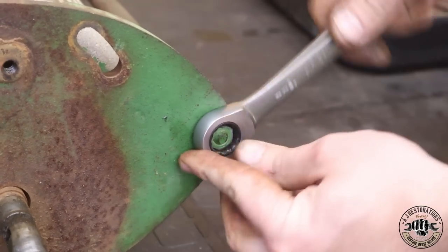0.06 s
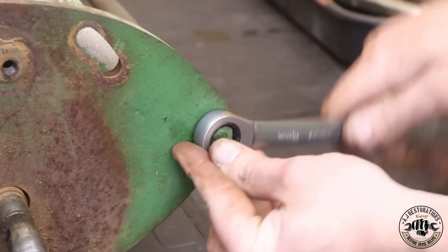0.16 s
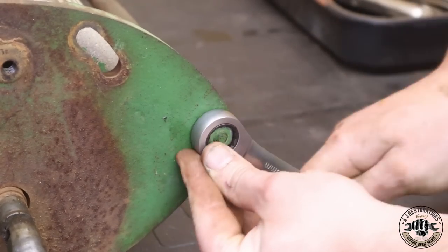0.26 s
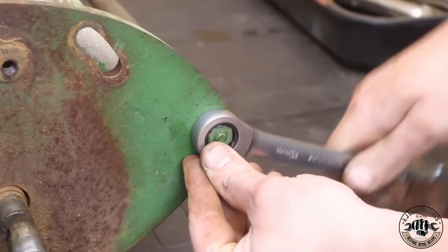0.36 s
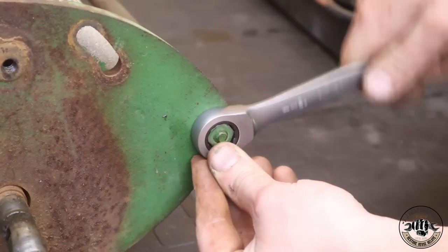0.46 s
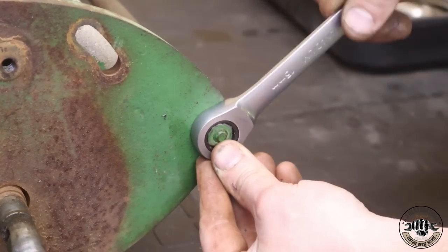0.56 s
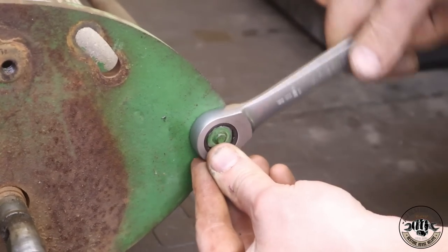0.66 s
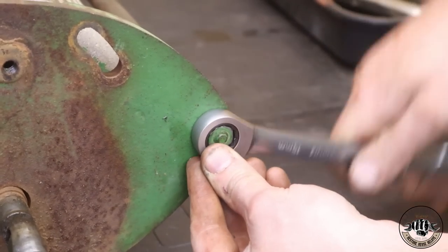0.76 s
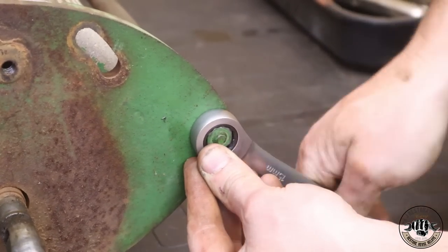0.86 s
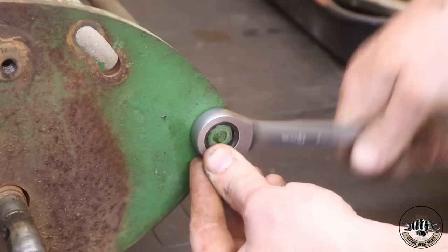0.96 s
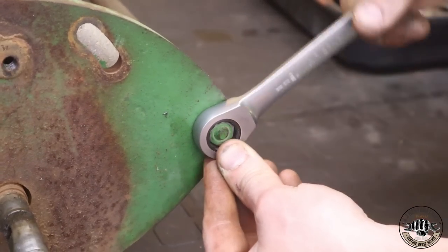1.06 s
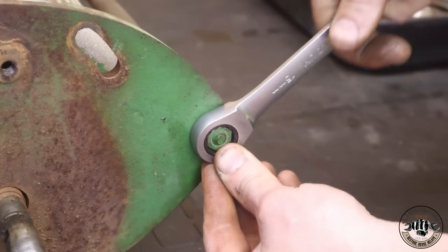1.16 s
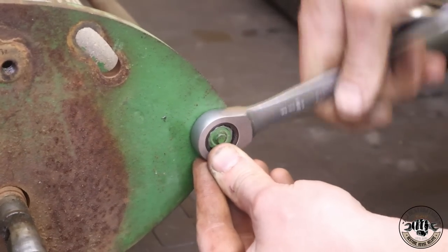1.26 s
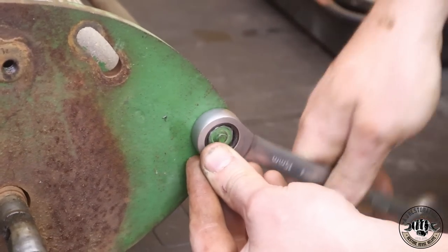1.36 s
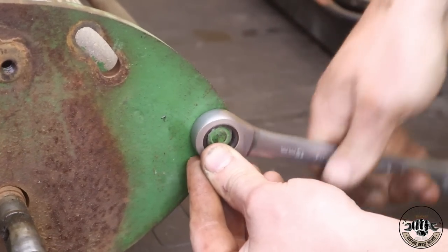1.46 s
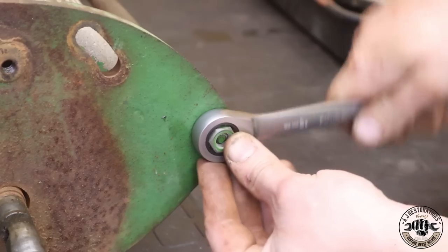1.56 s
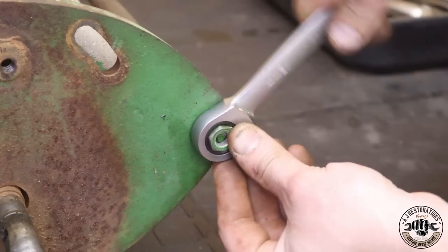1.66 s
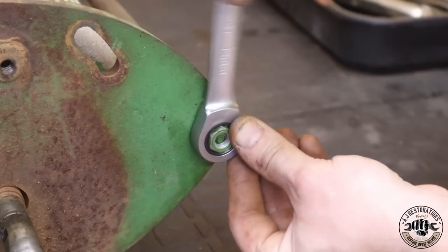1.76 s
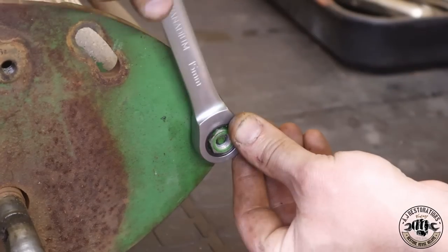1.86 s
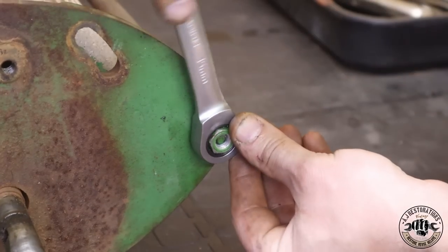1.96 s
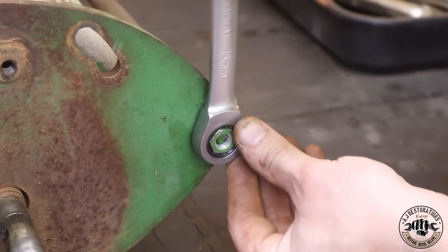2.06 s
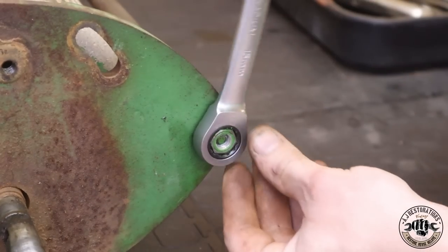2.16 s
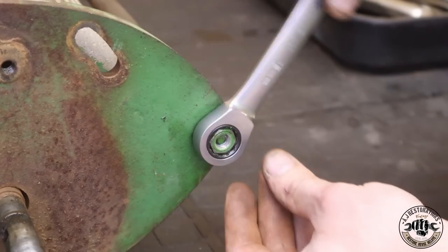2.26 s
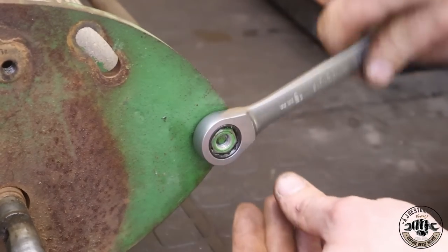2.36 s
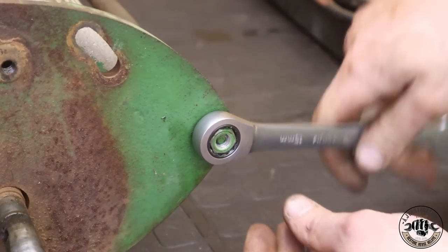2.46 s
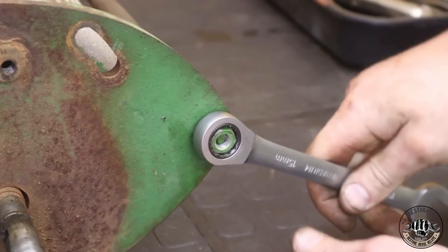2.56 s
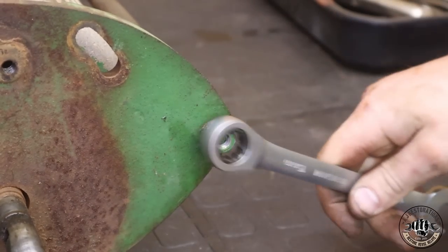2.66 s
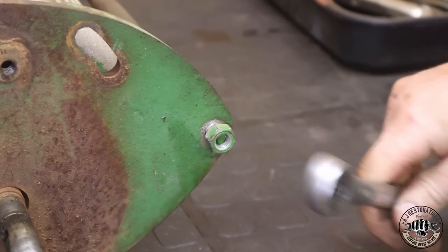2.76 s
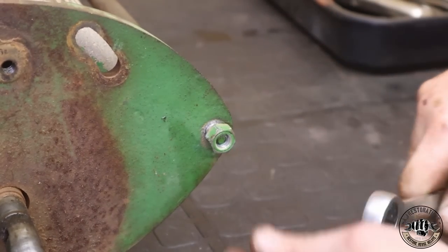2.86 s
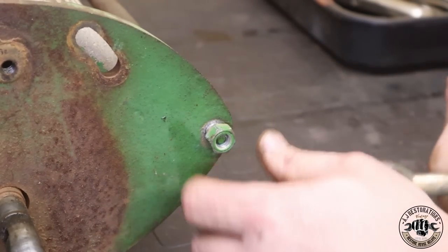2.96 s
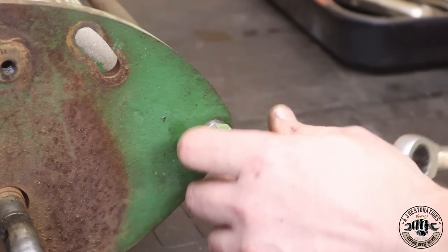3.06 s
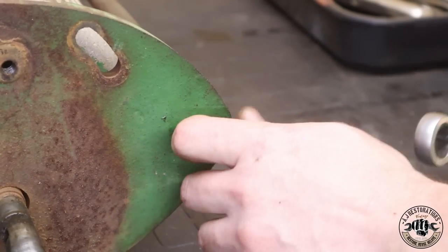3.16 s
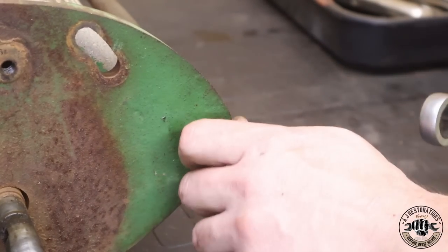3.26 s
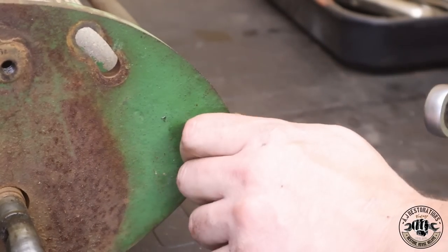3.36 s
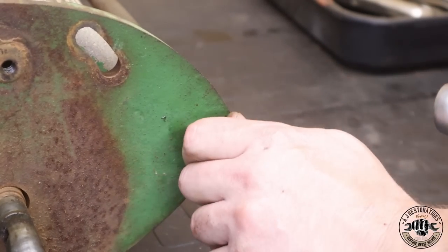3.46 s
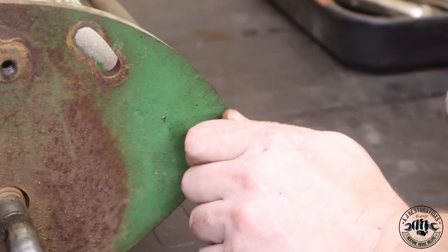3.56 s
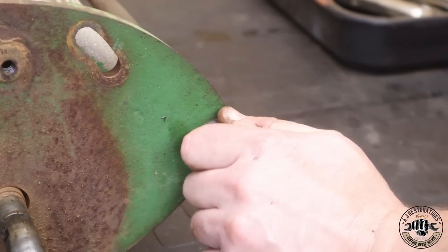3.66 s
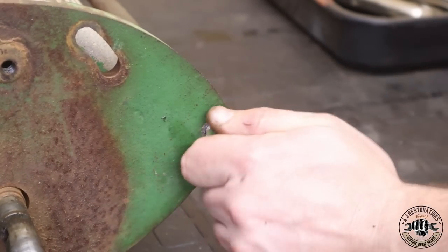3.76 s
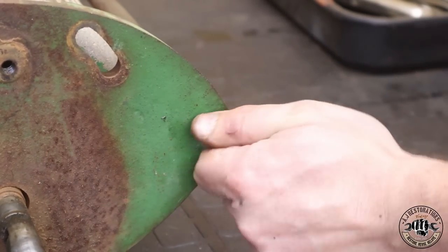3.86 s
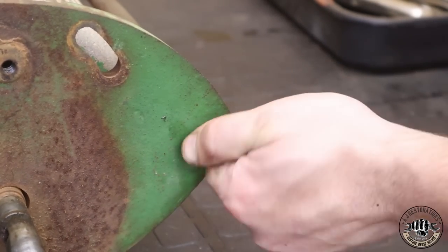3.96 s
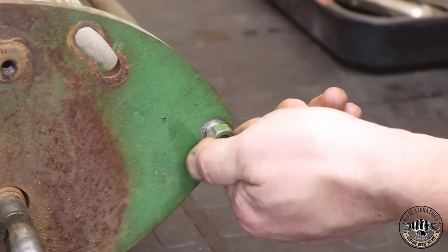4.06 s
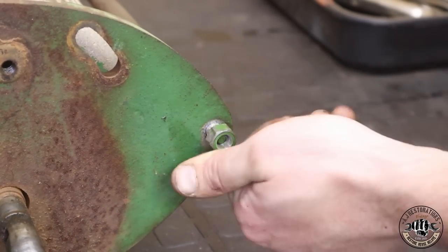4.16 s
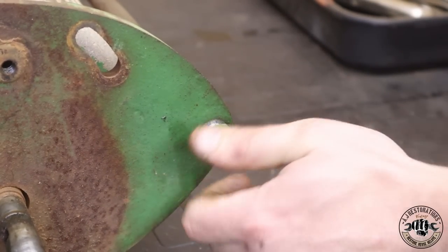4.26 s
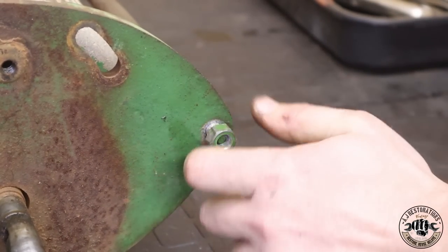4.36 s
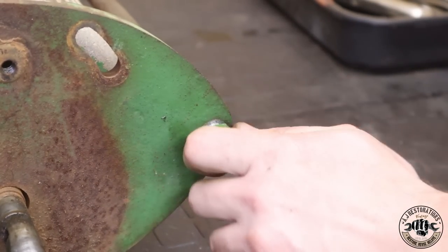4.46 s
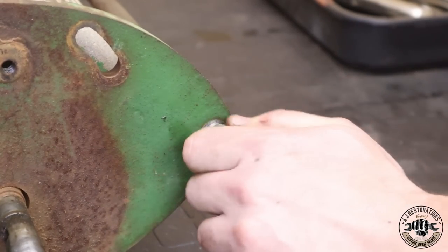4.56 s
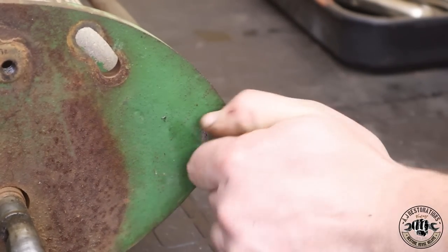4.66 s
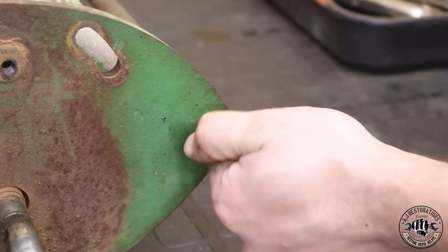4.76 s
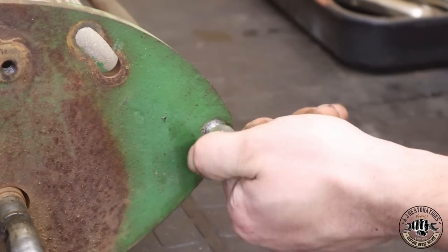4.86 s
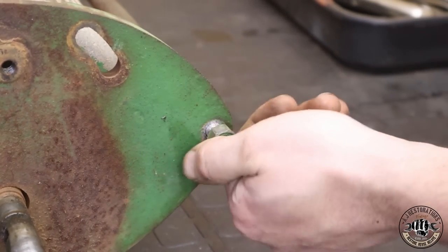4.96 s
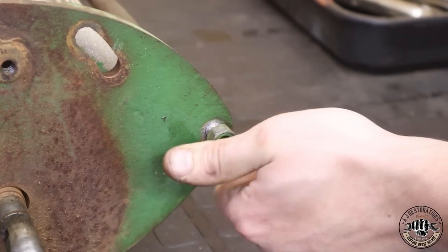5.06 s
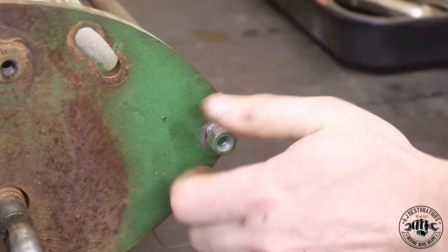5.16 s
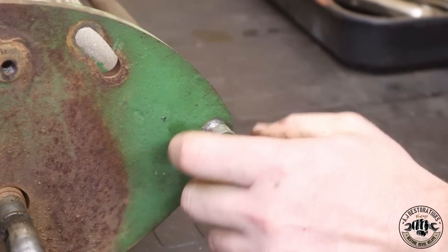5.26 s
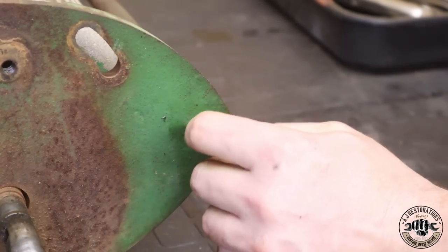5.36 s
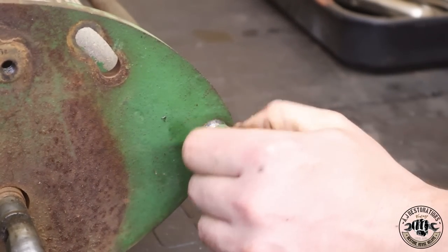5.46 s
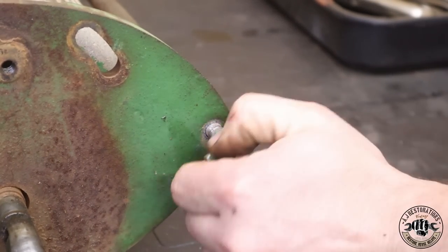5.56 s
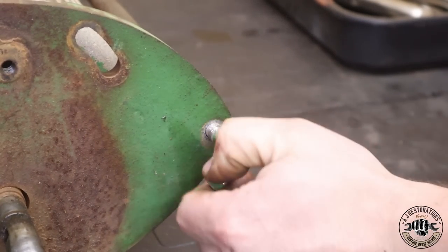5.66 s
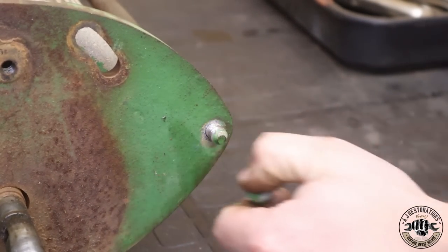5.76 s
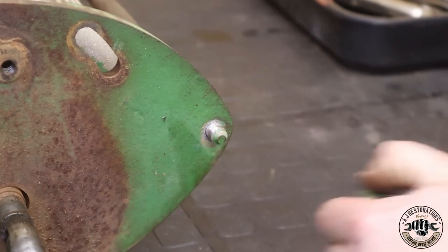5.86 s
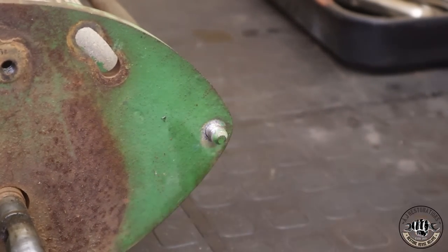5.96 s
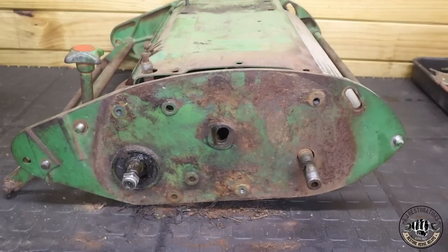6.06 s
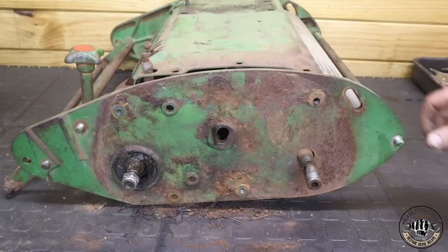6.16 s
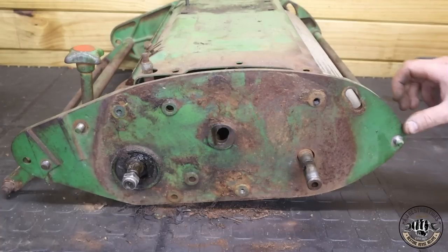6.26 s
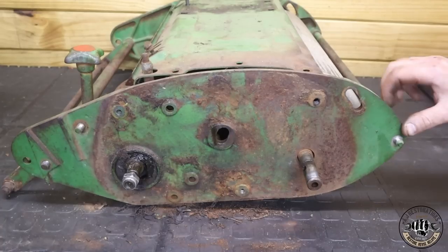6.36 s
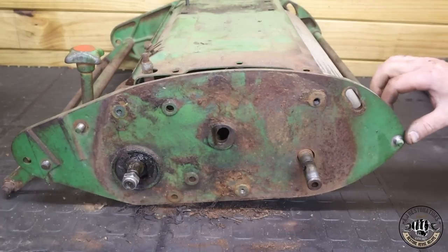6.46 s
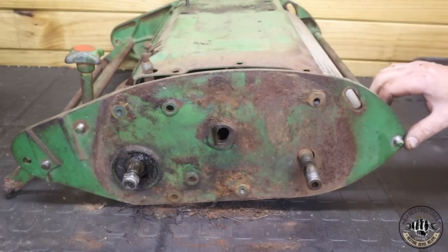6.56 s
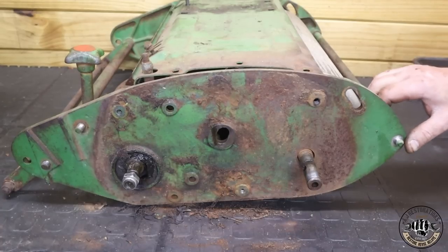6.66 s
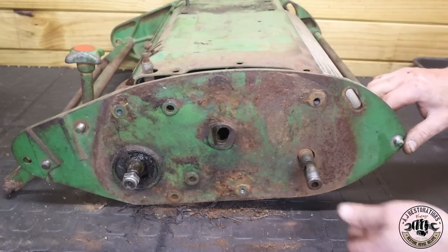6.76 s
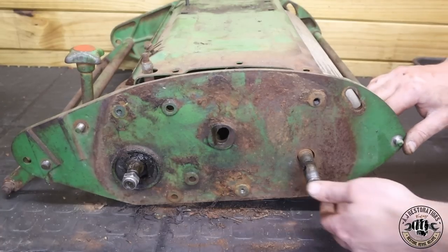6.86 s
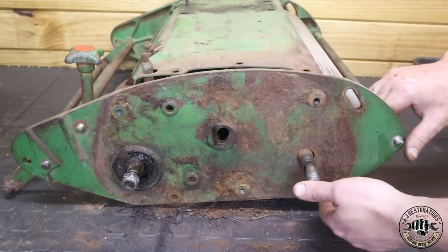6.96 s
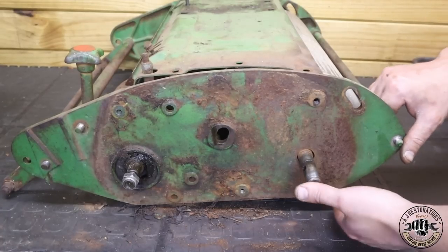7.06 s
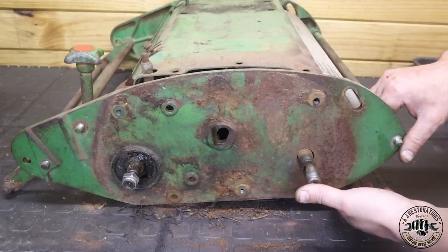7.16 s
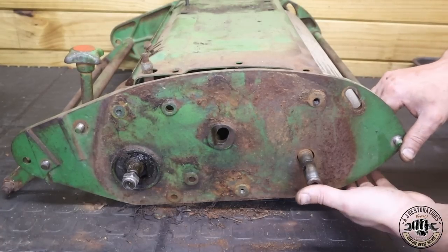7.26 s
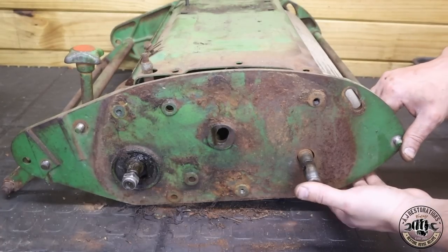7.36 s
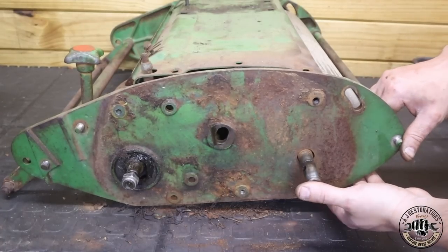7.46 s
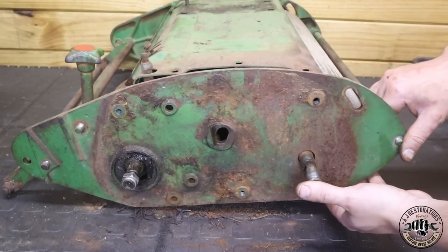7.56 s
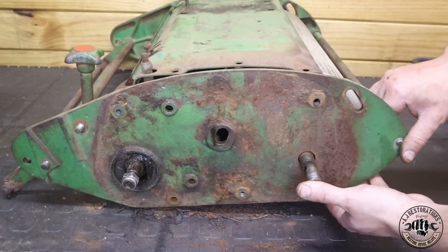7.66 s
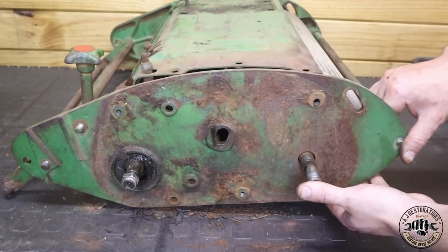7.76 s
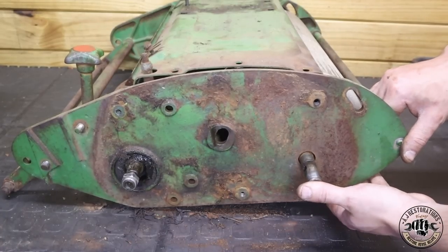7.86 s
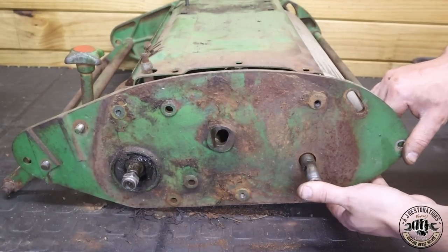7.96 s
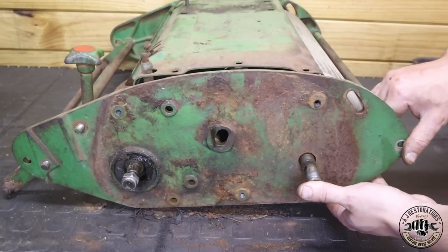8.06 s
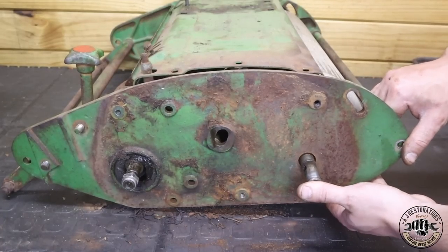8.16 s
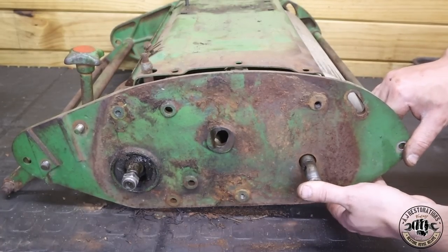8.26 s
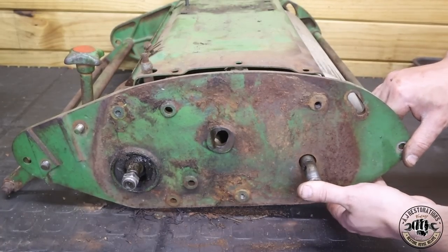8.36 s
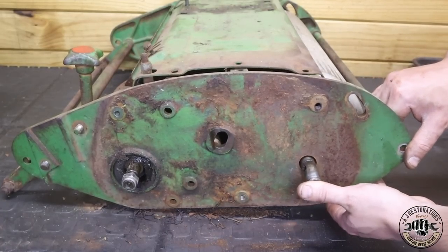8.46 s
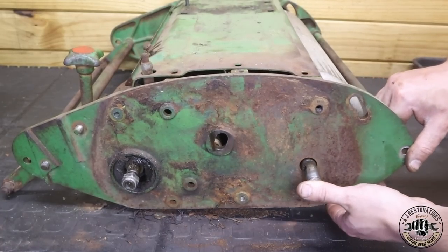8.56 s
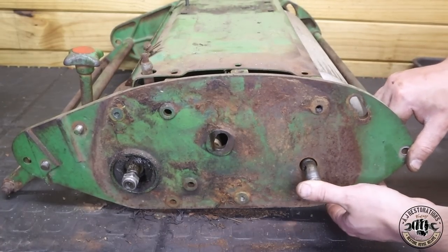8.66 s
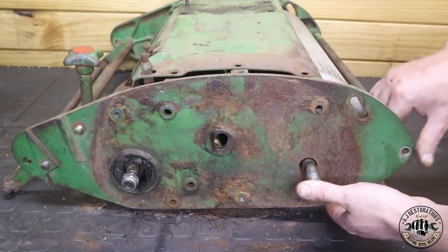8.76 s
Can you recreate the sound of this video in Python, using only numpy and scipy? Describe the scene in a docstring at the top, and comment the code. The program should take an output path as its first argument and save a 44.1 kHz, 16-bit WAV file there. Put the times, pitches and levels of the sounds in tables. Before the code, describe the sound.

In a quiet small workshop, heard close up in mono with low room air, a ratchet spanner turns a nut on a steel plate. Fast buzzing clicks, about 75 a second, come at 0.1-0.35, 0.8-0.9 and 1.35-1.45 s; between them are clinks and hollow plate thuds, strongest near 0.35, 0.7 and 0.9, lasting until 1.6. Around 2.1 single ticks run into a longer, brighter, freely ringing buzz at 2.3-2.65, then small clinks at 2.75 as the spanner lifts away. From 3.2 to 5.5 fingers twist the nut with barely audible gritty hisses; a light clink at 5.6. Faint far birds chirp around 2.8, 3.7, 4.3, 5.3 and 7.9. From 6.0 palms rub softly over metal. Rusty scrapes with groan and rasp come at 7.5, 7.6, 7.95, 8.25 and 8.45, then a hard double clang at 8.56 rings hollowly and fades.

```python
"""A ratchet spanner undoes a nut on the steel side plate of an old machine, close by in a small workshop.
The pawl buzzes over its teeth on each back swing; the ring takes up the load with thuds of the plate: struck modes.
Fingers spin the nut off, then the rusty casing is dragged off its shafts in short scrapes: showers of tiny slips.
It comes free with a clang of long shell modes. Birds, faint and far outside, are arching sines over quiet air."""
import sys
import numpy as np
from scipy import signal
from scipy.fft import rfft, irfft, next_fast_len
from scipy.io import wavfile

SR = 44100
rng = np.random.default_rng(int(sys.argv[2]) if len(sys.argv) > 2 else 0)


def persist_wave(psi):
    """Save psi, clipped to +-1, as 16-bit WAV."""
    counts = np.round(np.clip(psi, -1, 1) * 32767).astype(np.int16)
    wavfile.write(sys.argv[1], SR, np.atleast_2d(counts).T)


N = 388521
TIME = np.arange(N) / SR
RING_TIME = TIME[:SR * 6 // 10]   # time axis of one blow, 0.6 s

# Narrow bands that carry the dense modes of a blow: (centre Hz, filter)
EDGES = np.geomspace(20, 17000, 30)
BANK = [(np.sqrt(lo * hi), signal.butter(2, [lo, hi], "band", fs=SR, output="sos"))
        for lo, hi in zip(EDGES, EDGES[1:])]

# Levels in the tables are relative: each layer is scaled again where it is mixed.
# colour of the dense modes in a clink of the spanner's ring: freq_hz, level_db (per Hz)
CLINK_COLOUR = [(500, -8.5), (1100, 6), (1550, -2), (2100, -0.5), (4200, -7), (7000, -12.5), (9500, -22),
                (15000, -37)]
# ring time of the spanner's dense modes: freq_hz, t60_s
SPANNER_T60 = [(300, 0.22), (1500, 0.11), (7000, 0.12), (11000, 0.057), (15000, 0.061)]
# resonances of the spanner pressed on the plate: freq_hz, width_hz, level_db
HELD_PEAKS = [(1496, 120, 2), (1732, 79, -3), (2196, 110, -7.5), (2714, 130, -7.5), (2970, 43, -4),
              (3490, 24, 0.5), (4040, 44, -3), (4340, 43, -3.5), (4846, 134, -4), (5200, 35, -0.5),
              (6400, 110, -5.5), (6840, 46, -3.5), (6420, 28.3, 1), (7000, 75, -2), (7510, 66, -3.5),
              (8000, 31.4, -19), (8800, 90, -5), (9400, 75, -13), (9580, 38, -7), (11300, 29, -9)]


def ratchet():
    """Each tooth cracks and rings the spanner; a thumb on its head damps it and presses it to the plate."""
    thumb_off_s = 2
    # dense modes under the thumb: freq_hz, level_db (per Hz)
    held_colour = [(120, -60.5), (200, -30), (232, -23), (311, -31), (601, -18.5), (1000, -14),
                   (1120, -11.5), (1230, -11), (1480, -3.5), (2090, -12.5), (2610, -4.5), (4600, -6.5),
                   (6760, -4.5), (14600, -17.5), (16000, -17)]
    # dense modes of the spanner hanging free: freq_hz, level_db (per Hz)
    free_colour = [(120, -54.5), (200, -20), (380, -14), (519, -18.5), (933, -8.5), (1000, -17),
                   (1080, -20), (1230, -19), (1560, -0.5), (2420, -5), (3020, -0.5), (4600, -4), (6760, -1),
                   (8420, -13), (16000, -9.5)]
    # resonances of the spanner hanging free: freq_hz, width_hz, level_db
    free_peaks = [(1068, 13, 4.5), (1370, 7.5, 9), (1606, 180, -3.5), (2000, 62, -6), (2370, 15, 5.5),
                  (2660, 22, 8.5), (3100, 170, -2.5), (3240, 78, -14), (3430, 46, -32), (3630, 22, -5),
                  (3810, 120, -0.5), (4900, 105, -1), (5260, 15, 11.5), (5600, 31, -18), (5840, 200, -21),
                  (6400, 70, -15), (6970, 150, 2.5), (7900, 51, 3), (7670, 40, -16.5), (8200, 60, -41),
                  (8600, 51, -23), (8800, 27, -8.5), (8740, 42, -10.5), (8900, 22.1, -1), (9200, 40, 1.5),
                  (9900, 31, -24.5), (9150, 31, 1.5), (10400, 120, -27.5), (11100, 41, 1),
                  (11430, 100, -19)]

    teeth = pawl()
    held = TIME < thumb_off_s
    damped = strike(teeth * held, held_colour, SPANNER_T60, room_db=-19, swell_cycles=3.7,
                    modes=as_modes(HELD_PEAKS, lasting=5.1), modes_db=-1.5)
    free = strike(teeth * ~held, free_colour, SPANNER_T60, room_db=-15.5, swell_cycles=1.5,
                  modes=as_modes(free_peaks, lasting=12.8), modes_db=-0.5, count=5)
    crack = snap(teeth, low_hz=9980, t60=0.0053)
    # the casing sings on faintly at its longest ring
    shell_hz, shell_t60_s = 1724, 0.97
    shell_ring = fade(shell_t60_s) * np.sin(2 * np.pi * shell_hz * RING_TIME)
    shell = signal.oaconvolve(teeth, shell_ring)[:N]
    return from_db(-2.5) * damped + from_db(-1.73) * free + from_db(7.0) * crack + from_db(-38.0) * shell


def pawl():
    """The pawl drops over evenly spaced teeth; each swing starts gently, weakens a little and brakes at its end."""
    # back swings of the spanner: first_tooth_s, last_tooth_s, teeth_per_s, level_db,
    # loss_db (by the last tooth), brake (stretch of the last gap, in gaps)
    swings = [(0.112, 0.339, 75, -12.5, 4.1, 1.19), (0.777, 0.901, 80, -12.5, 2.2, 0.14),
              (1.350, 1.466, 78, -11.5, 4.8, 0.7), (2.288, 2.637, 57.3, -13.5, 0.37, 0.85)]
    # single teeth, as the spanner is eased back slowly: start_s, level_db
    single_teeth = [(2.135, -14), (2.182, -12.5), (2.216, -12), (2.247, -13.5)]
    brake_teeth = 0.7   # the hand slows over about this many teeth
    first_tooth_db = -1   # the swing is still gathering speed
    scatter_db, scatter_s = 0.5, 0.0006   # unevenness of the teeth and of the hand

    teeth = clicks(*np.transpose(single_teeth))
    for start_s, end_s, per_s, db, loss_db, brake in swings:
        length_s = end_s - start_s
        teeth_left = np.arange(round(length_s * per_s))[::-1]
        gaps = 1 + brake * np.exp(-teeth_left / brake_teeth)
        progress = np.append(0, np.cumsum(gaps)) / gaps.sum()
        late, strong = rng.standard_normal((len(progress), 2)).T
        levels_db = db - loss_db * progress + first_tooth_db * (progress == 0) + scatter_db * strong
        teeth = teeth + clicks(start_s + length_s * progress + scatter_s * late, levels_db)
    return teeth


def knocks():
    """The ring takes up its slack: the spanner clinks, the plate thuds and the machine rocks on the bench."""
    # knocks on nut and plate: start_s, boom_db (bench), thud_db (plate), clink_db (ring)
    knock_list = [(0.015, -27.5, -29, -43.5), (0.093, -59, -36, -37), (0.342, -30.5, -16.5, -30),
                  (0.407, -43, -57, -29), (0.446, -54.5, -24.5, -20.5), (0.544, -45.5, -43.5, -51),
                  (0.682, -28, -19.5, -46.5), (0.693, -31, -48, -25), (0.914, -35.5, -9.5, -26),
                  (1.004, -51, -53, -31.5), (1.027, -47, -27.5, -28.5), (1.039, -36.5, -26.5, -36.5),
                  (1.133, -31.5, -38.5, -51.5), (1.224, -29.5, -22, -46), (1.261, -46, -34, -27),
                  (1.321, -63, -35, -26), (1.539, -64, -33.5, -29.5), (1.552, -57, -31, -31.5),
                  (1.58, -56, -55, -38), (1.6, -60, -22.5, -27.5), (1.92, -36.5, -47, -67)]
    # dense modes of the bench: freq_hz, level_db (per Hz)
    boom_colour = [(35, -28), (70, -2), (140, -6.5), (220, -4), (400, -4.5), (900, -47)]
    # ring time of the bench: freq_hz, t60_s
    bench_t60 = [(70, 0.12), (300, 0.19)]
    # dense modes of the side plate: freq_hz, level_db (per Hz)
    thud_colour = [(90, -32.5), (170, -12.5), (260, -9), (480, 1), (850, -2.5), (1100, -7), (1750, -1.5),
                   (2100, -27.5), (5000, -57.5)]
    # ring time of the plate's dense modes: freq_hz, t60_s
    plate_t60 = [(100, .3), (400, 0.12), (1500, 0.028), (6000, 0.074)]
    # clear modes of the plate: freq_hz, level_db, t60_s
    plate_modes = [(277, -13, 0.34), (421.3, 3, 0.087), (588, -8.5, 0.4), (730, -10.5, 0.24),
                   (1424, 1, 0.12), (1843, -6, 0.18), (2390, -18, 0.31), (3100, -15, 0.18),
                   (3300, -26.5, 0.1), (4060, -27.5, 0.14), (4240, -15, 0.2366), (4450, -28.5, 0.35)]

    start_s, boom_db, thud_db, clink_db = np.transpose(knock_list)
    boom = strike(clicks(start_s, boom_db), boom_colour, bench_t60, room_db=-12.5, swell_cycles=0.053, count=3)
    thud = strike(clicks(start_s, thud_db), thud_colour, plate_t60, room_db=-16, swell_cycles=.16,
                  modes=plate_modes, modes_db=-4)
    clink = strike(clicks(start_s, clink_db), CLINK_COLOUR, SPANNER_T60, room_db=-15.5, swell_cycles=0.65,
                   modes=as_modes(HELD_PEAKS, lasting=5.7), modes_db=-10.5, count=4)
    return from_db(-2.5) * boom + from_db(-2.0) * thud + from_db(-0.1) * clink


def nut():
    """Ring and nut clink and tick on the stud; the loose nut hisses along its gritty thread in tiny slips."""
    # finger strokes on the nut and the stud's thread: start_s, rise_s (to full speed), level_db
    twists = [(3.235, 0.052, -58.5), (3.77, 0.05, -60.5), (3.84, 0.11, -55), (3.96, 0.096, -58.5),
              (4.07, 0.13, -63), (4.605, 0.083, -50.5), (4.725, 0.058, -52), (4.89, 0.056, -59.5),
              (5.02, 0.053, -65), (5.48, 0.09, -54), (6.58, 0.18, -59.5), (6.88, 0.097, -55)]
    # colour of the hiss: freq_hz, level_db
    hiss_colour = [(300, -22), (1200, -5), (1600, 14), (2100, -64), (2800, 7), (4500, 2), (7500, -2),
                   (10000, -1), (15000, -19)]
    # resonances stirred by the thread: freq_hz, width_hz, level_db
    nut_peaks = [(1607, 17, 4.5), (2620, 39, -4.5), (4900, 39, -9), (6840, 25, -1), (7600, 73, -12.5)]
    # light touches of ring and nut on the stud: start_s, level_db
    clinks = [(2.036, -31.5), (2.075, -22.5), (2.728, -20.5), (2.743, -22.5), (2.764, -31.5), (4.67, -40.5),
              (5.57, -24), (5.57, -16.5)]
    # clear modes of the stud: freq_hz, level_db, t60_s
    stud_modes = [(1073, -7, 0.26), (1590, 0.5, 0.17), (2190, -25.5, 0.42), (2850, -21, 0.11),
                  (3300, -33, 0.34), (3320, -26.5, 0.43), (3826, -35, 0.24), (3930, -18, 0.23),
                  (4250, -31, 0.33), (5155, -26.5, 0.18), (5200, -11.5, 0.13), (6132, -22, 0.16),
                  (6660, -15.5, 0.17), (7140, -10, 0.11)]
    # sharp dry ticks: the spanner touching the stud, then grit in the thread: start_s, level_db
    dry_ticks = [(2.7633, -16), (3.8066, -28), (4.1083, -29)]

    slips = friction(per_s=2200, spread_db=0.0)
    turning = strokes(*np.transpose(twists), fall_db_per_s=144, power=1.5)
    running = turning * (noise(hiss_colour, slips) + resonate(slips, nut_peaks))
    touches = strike(clicks(*np.transpose(clinks)), CLINK_COLOUR, SPANNER_T60, room_db=-24, swell_cycles=0.98,
                     modes=stud_modes, modes_db=0.5, count=4)
    ticking = snap(clicks(*np.transpose(dry_ticks)), low_hz=5470, t60=0.0086)
    return from_db(0.5) * running + from_db(-16.0) * touches + from_db(-4.5) * ticking


def casing():
    """Hands find a grip on the casing, drag it along and knock it free."""
    return from_db(-3.5) * hands() + from_db(-3.0) * drags() + clang()


def hands():
    """Palms slide over the casing: many small skin slips with a soft colour."""
    # slides for a grip: start_s, rise_s (to full speed), level_db
    slides = [(6.0, 0.2, -54.5), (6.29, 0.14, -46), (6.52, 0.26, -47), (6.83, 0.17, -44),
              (7.28, 0.14, -50.5)]
    # colour of skin on the casing: freq_hz, level_db
    palm_colour = [(150, 1), (450, 4), (1000, -0.5), (1600, -3), (2400, -8.5), (7000, -14), (14000, -26)]
    sliding = strokes(*np.transpose(slides), fall_db_per_s=40, power=0.91)
    return sliding * noise(palm_colour, friction(per_s=6000, spread_db=1))


def drags():
    """Rust grinds on the shafts in uneven slips and stirs the casing's resonances."""
    # drags of the casing: start_s, rise_s (to full speed), groan_db, rasp_db
    drag_list = [(7.493, 0.13, -22.5, -21.5), (7.625, 0.085, -23, -24), (7.951, 0.071, -20, -16.5),
                 (8.245, 0.11, -23.5, -18), (8.454, 0.12, -24.5, -19)]
    # colour of the grinding: freq_hz, level_db
    rust_colour = [(35, -49), (60, -2), (227, -3.5), (315, -9), (417, 7), (458, -0.5), (666, 3), (946, -16),
                   (1200, -6.5), (1740, 3), (2050, -12), (3580, -7.5), (4640, -16), (8510, -11.5),
                   (16000, -30)]
    # resonances stirred by rubbing: freq_hz, width_hz, level_db
    rust_peaks = [(231, 15, -10), (656, 34, -1.5), (808, 11, -5), (929, 22, -6.5), (1115, 12, -11),
                  (1738, 18, 1.5), (2230, 32, -10.5), (2580, 45, -12), (2770, 20, -16), (3080, 18, -11.5),
                  (3484, 23, -13.5), (4265, 57, -14), (4770, 23, -22), (4950, 75, -19), (5460, 21, -22),
                  (5640, 39, -26), (6240, 83, -18), (6800, 18, -8.5), (7340, 38, -23), (7600, 32, -18)]

    start_s, rise_s, groan_db, rasp_db = np.transpose(drag_list)
    groan_level = strokes(start_s, rise_s, groan_db, fall_db_per_s=192, power=2.7)
    rasp_level = strokes(start_s, rise_s, rasp_db, fall_db_per_s=336, power=2.12)
    judder = from_db(1.4 * rms_one(cut(rng.standard_normal(N), 110, "low")))   # 1.4 dB rms
    slips = friction(per_s=3700, spread_db=0.5) * judder
    grinding = noise(rust_colour, slips) + from_db(2.0) * resonate(slips, rust_peaks)
    groan = rms_one(cut(grinding, 1360, "low", order=4))
    rasp = rms_one(cut(grinding, 840, "high", order=4))
    return groan_level * groan + rasp_level * rasp


def clang():
    """The casing clatters off the shaft; only the hardest blow sets the whole shell ringing."""
    # jumps off the shaft and rebounds: start_s, level_db
    clangs = [(8.555, -12), (8.563, 3.5), (8.572, 6), (8.582, -9), (8.593, -16), (8.626, -17)]
    # dense modes of the casing: freq_hz, level_db (per Hz)
    clang_colour = [(41, -57), (70, -26), (268, -10.5), (394, -12), (431, 1.5), (541, -30), (744, -3),
                    (853, -16), (1730, 2.5), (2020, -2.5), (2540, -4), (6450, -16), (16000, -47)]
    # ring time of those dense modes: freq_hz, t60_s
    casing_t60 = [(150, 0.43), (700, 0.38), (2000, 0.037), (6000, 0.088), (14000, 0.082)]
    # clear modes of the whole shell: freq_hz, level_db, t60_s
    casing_modes = [(239, -11.5, 0.62), (376, -12, 0.64), (550, -13, 0.23), (748, 2.5, 0.48),
                    (896, -7.5, 0.37), (1020, -28, 0.25), (1142, -9, 0.32), (1240, -30, 0.27),
                    (1550, -16, 0.44), (1700, -9.5, 0.45), (1857, -17, 0.35), (2003, -23, 0.31),
                    (2330, -14, 0.31), (2826, -8, 0.23), (3490, -11, 0.31), (3380, -25, 0.22),
                    (3620, 2.5, 0.048), (3830, -25, 0.18), (4400, -29, 0.18), (4829, -32, 0.19)]

    blows = clicks(*np.transpose(clangs))
    clatter = strike(blows, clang_colour, casing_t60, room_db=-20.0, swell_cycles=0.42, count=4)
    shell = 0
    for hz, db, t60 in casing_modes:
        mode = fade(t60) * np.sin(2 * np.pi * hz * RING_TIME)
        shell = shell + from_db(db) * mode * rng.choice([-1, 1])
    hardest = blows * (blows == blows.max())
    ringing = signal.oaconvolve(hardest, shell)[:N]
    return from_db(-16) * clatter + from_db(-22.5) * ringing


def birds(waver_hz=110):
    """Far arching whistles, heard directly and smeared by reflections on their way in."""
    # chirps outside: start_s, length_s, top_hz, level_db
    chirps = [(2.82, 0.13, 3870, -70), (3.666, 0.062, 3100, -60), (3.73, 0.135, 3780, -58),
              (4.17, 0.05, 2950, -62), (4.248, 0.047, 3370, -57), (4.344, 0.05, 3520, -58),
              (5.234, 0.14, 4200, -57.5), (5.397, 0.12, 3990, -61.5), (7.879, 0.19, 4220, -55)]
    foot_hz, arch = 2500, 0.66   # each rises from this pitch and runs through this share of an arch

    direct = np.zeros(N)
    for start_s, length_s, top_hz, db in chirps:
        i, size = int(start_s * SR), int(length_s * SR)
        turn = np.linspace(0, np.pi, size)
        waver = waver_hz * rms_one(cut(rng.standard_normal(len(RING_TIME)), 167, "low"))[:size]
        pitch_hz = foot_hz + (top_hz - foot_hz) * np.sin(arch * turn) + waver
        direct[i:i + size] += from_db(db) * np.sin(turn) * np.sin(2 * np.pi * np.cumsum(pitch_hz) / SR)
    echoes = rng.standard_normal(len(RING_TIME)) * fade(0.24)
    echoes = echoes / np.linalg.norm(echoes)
    return from_db(2.5) * direct + from_db(5) * signal.oaconvolve(direct, echoes)[:N]


def workshop_air():
    """The quiet air of the workshop: steady noise, strongest in the bass."""
    # colour of the air: freq_hz, level_db
    air_colour = [(13, -40), (22, -5.5), (128, -0.5), (200, -10.5), (229, -4), (278, -9), (347, -10),
                  (432, -8), (602, -14.5), (750, -12.5), (815, -14), (1710, -18.5), (3610, -22),
                  (5930, -24.5), (16000, -28.5)]
    return from_db(-53) * noise(air_colour, rng.standard_normal(N))


def strike(hits, spectrum, decay, room_db, swell_cycles, modes=(), modes_db=0, count=6):
    """Contacts land on a few spots in turn; the spots share half of their fine pattern of modes."""
    shared, *own = rng.standard_normal((count + 1, 2, len(RING_TIME)))
    spots = [response(shared + white, spectrum, decay, modes, modes_db, room_db, swell_cycles)
             for white in own]
    out = np.zeros(N + len(RING_TIME))
    for k, i in enumerate(np.flatnonzero(hits)):
        out[i:i + len(RING_TIME)] += hits[i] * rebound(spots[k % count])
    return out[:N]


def response(white, spectrum, decay, modes, modes_db, room_db, swell_cycles):
    """One blow: dense modes, a few clear ones and the workshop's tail; the first 20 ms have rms 1."""
    # ring time of the workshop: freq_hz, t60_s
    room_t60 = [(100, .6), (600, 0.56), (3000, 0.37), (8000, 0.22), (15000, .15)]
    wash = clear = 0
    for k, (hz, band) in enumerate(BANK):
        ring = fade(at_hz(decay, hz)) + from_db(room_db) * fade(at_hz(room_t60, hz))
        shape = swell(hz, swell_cycles) * ring
        wash = wash + from_db(at_hz(spectrum, hz)) * signal.sosfilt(band, white[k % 2] * shape)
    for hz, db, t60 in modes:
        phase = 2 * np.pi * (hz * RING_TIME + rng.random())
        clear = clear + from_db(db) * swell(hz, swell_cycles) * fade(t60) * np.sin(phase)
    both = rms_one(wash) + from_db(modes_db) * rms_one(clear)
    return both / np.std(both[:SR // 50])


def rebound(blow):
    """Hard steel bounces twice within two milliseconds, giving each contact a treble colour of its own."""
    lags = (rng.uniform(.0002, .002, 2) * SR).astype(int)
    bright = .5 * cut(blow, 1500, "high")
    out = blow
    for lag in lags:
        out = out + rng.choice([-1, 1]) * np.pad(bright, (lag, 0))[:len(blow)]
    return out * np.std(blow) / np.std(out)


def swell(hz, cycles):
    """Low bending waves spread through the steel more slowly than high ones."""
    return 1 - np.exp(-RING_TIME * hz / cycles)


def fade(t60):
    """Free decay of an amplitude, 60 dB in t60 seconds."""
    return np.exp(-np.log(1000) * RING_TIME / t60)


def as_modes(peaks, lasting):
    """The narrower a resonance, the longer it rings, up to a limit set by its pitch: rows of (Hz, dB, t60 s)."""
    modes = []
    for hz, width, db in peaks:
        longest = 1.3 * at_hz(SPANNER_T60, hz)
        modes.append((hz, db + 20 * np.log10(width), min(lasting / width, longest)))
    return modes


def snap(hits, low_hz, t60):
    """The short bright crack of a small hard contact: decaying noise above low_hz."""
    keep = from_db(-60 / (t60 * SR))   # gain per sample
    envelope = signal.lfilter([1], [1, -keep], hits + 1e-18)
    return cut(envelope * rng.standard_normal(N), low_hz, "high")


def friction(per_s, spread_db):
    """Tiny slips at random moments; spread_db makes their sizes uneven."""
    sizes = from_db(spread_db * np.minimum(rng.exponential(1, N), 4)) * rng.choice([-1, 1], N)
    return sizes * (rng.random(N) < per_s / SR)


def strokes(starts, rises, levels_db, fall_db_per_s, power):
    """Loudness of rubbing: each stroke gathers speed along a quarter sine, then dies away."""
    total = 0
    for start_s, rise_s, db in zip(starts, rises, levels_db):
        speed = np.sin(np.pi / 2 * np.clip((TIME - start_s) / rise_s, 0, 1))
        fall_db = fall_db_per_s * np.clip(TIME - start_s - rise_s, 0, 2)
        total = total + (speed ** power * from_db(db - fall_db)) ** 2   # powers add
    return np.sqrt(total)


def clicks(times, db):
    """One impulse for each contact."""
    out = np.zeros(N)
    out[np.round(np.asarray(times) * SR).astype(int)] = from_db(db)
    return out


def noise(spectrum, source):
    """A white source given a smooth colour; rms 1."""
    size = next_fast_len(N)
    hz = np.maximum(np.arange(size // 2 + 1) * SR / size, 1)
    return rms_one(irfft(rfft(source, size) * from_db(at_hz(spectrum, hz)), size)[:N])


def resonate(x, peaks):
    """Parallel two-pole resonances of (Hz, width Hz, dB) with alternating signs; rms 1."""
    out = 0
    for k, (hz, width, db) in enumerate(peaks):
        r = np.exp(-np.pi * width / SR)   # pole radius
        zeros = (1 - r * r) / 2 * np.array([1, 0, -1])
        poles = [1, -2 * r * np.cos(2 * np.pi * hz / SR), r * r]
        out = out + (-1) ** k * from_db(db) * signal.lfilter(zeros, poles, x)
    return rms_one(out)


def cut(x, hz, kind, order=2):
    """Low- or high-pass."""
    return signal.sosfilt(signal.butter(order, min(hz, .45 * SR), kind, fs=SR, output="sos"), x)


def at_hz(points, hz):
    """Read a table on a log-frequency axis."""
    f, value = np.transpose(points)
    return np.interp(np.log(hz), np.log(f), value)


def from_db(db):
    """Decibels to gain."""
    return 10 ** (np.asarray(db) / 20)


def rms_one(x):
    """Scale to unit power."""
    return x / np.sqrt(np.mean(x ** 2) + 1e-20)


def scene():
    """The work on the bench, close by, over far birds and the quiet air of the workshop; one channel."""
    return (ratchet() + knocks() + nut() + casing() + birds() + workshop_air())[None]


def record(dry):
    """At the microphone the loudest peaks are rounded and the top is cut."""
    rounded = 1.648 * np.tanh(dry / 1.556)
    cutoff_hz = 15900
    return signal.sosfilt(signal.ellip(10, .2, 70, cutoff_hz, fs=SR, output="sos"), rounded)


dry = scene()
out = record(dry)
persist_wave(out)
```